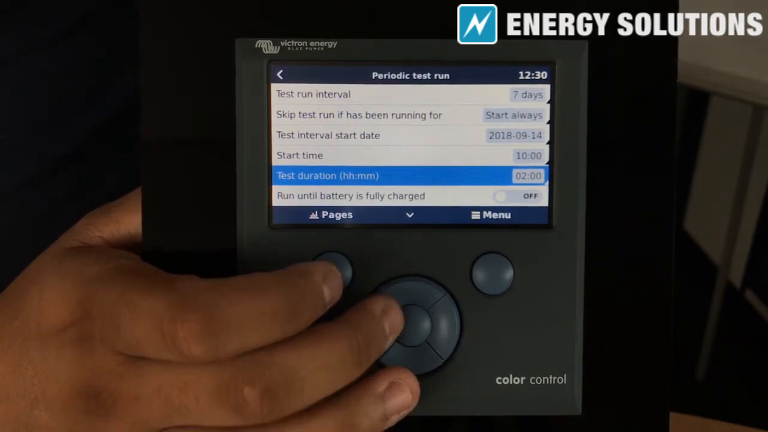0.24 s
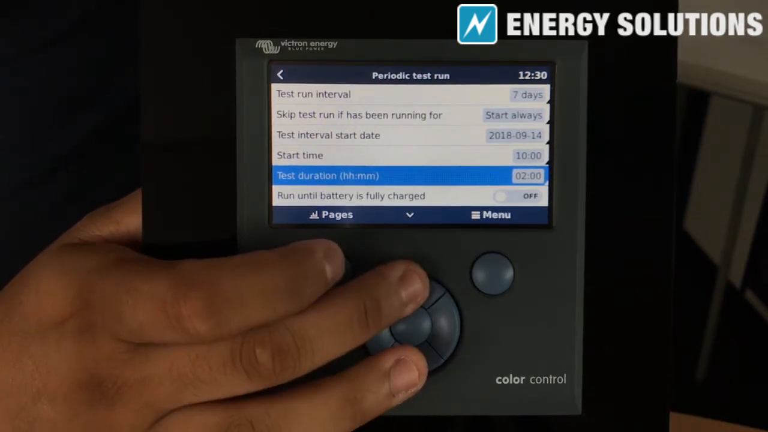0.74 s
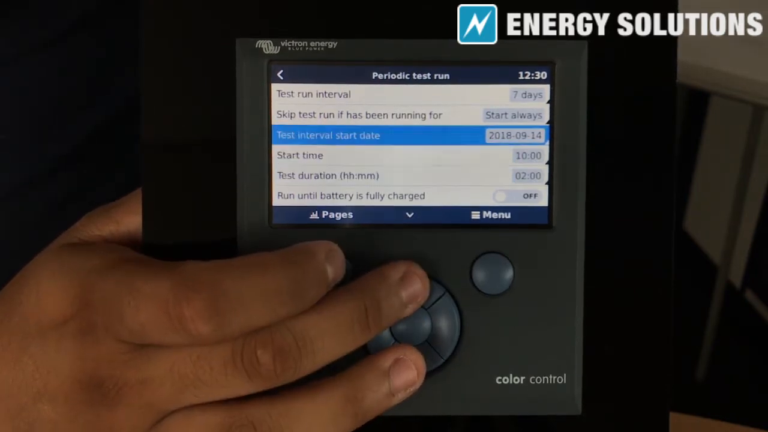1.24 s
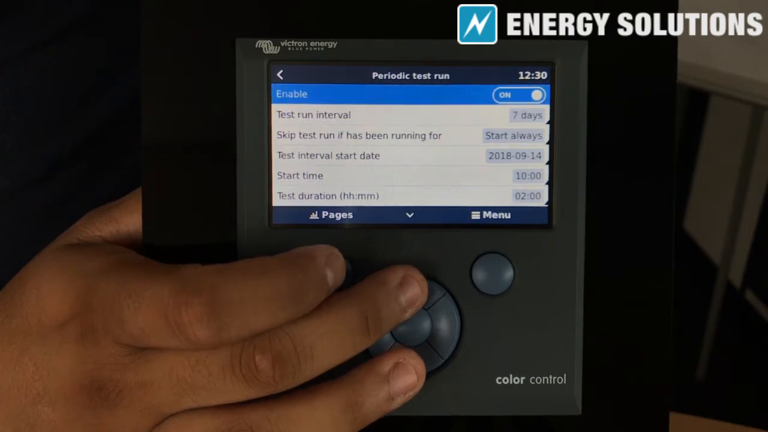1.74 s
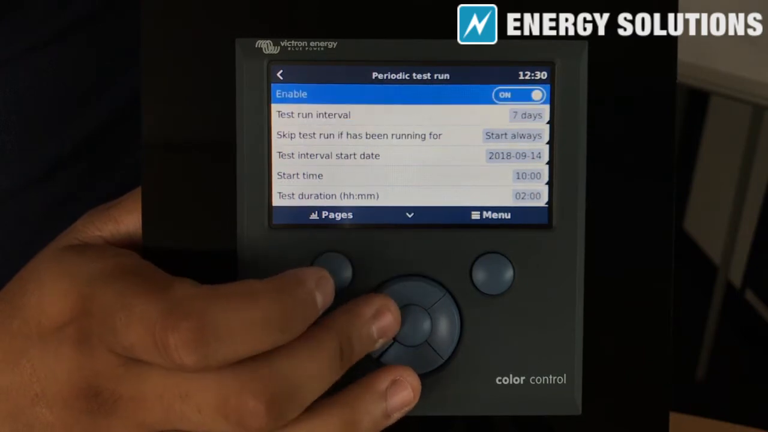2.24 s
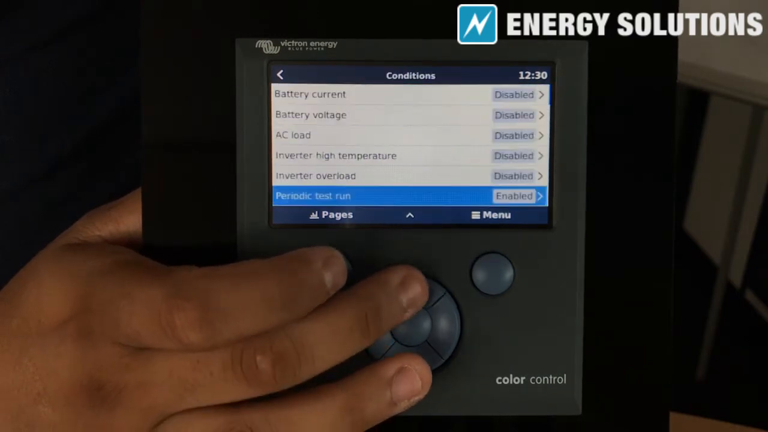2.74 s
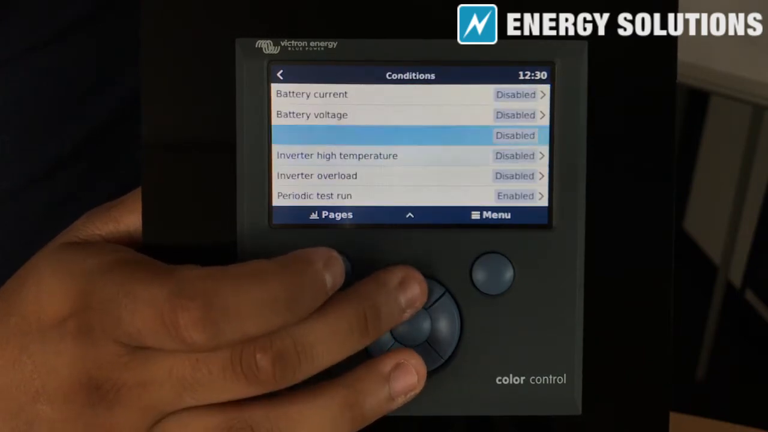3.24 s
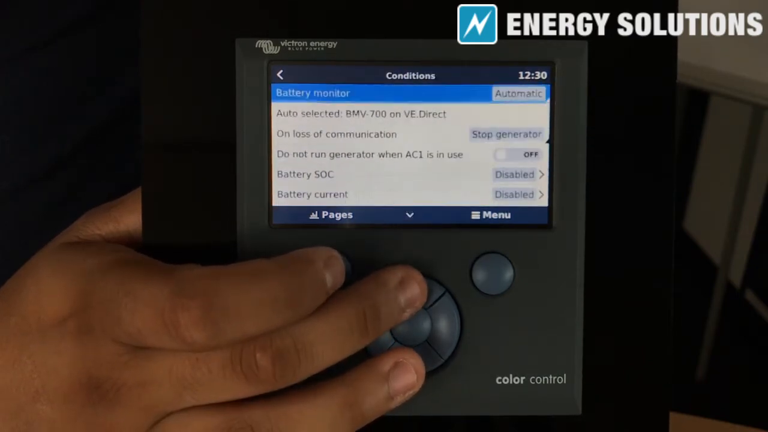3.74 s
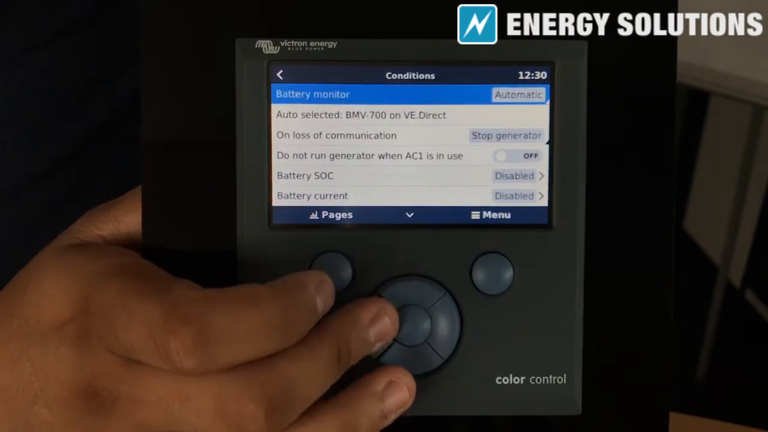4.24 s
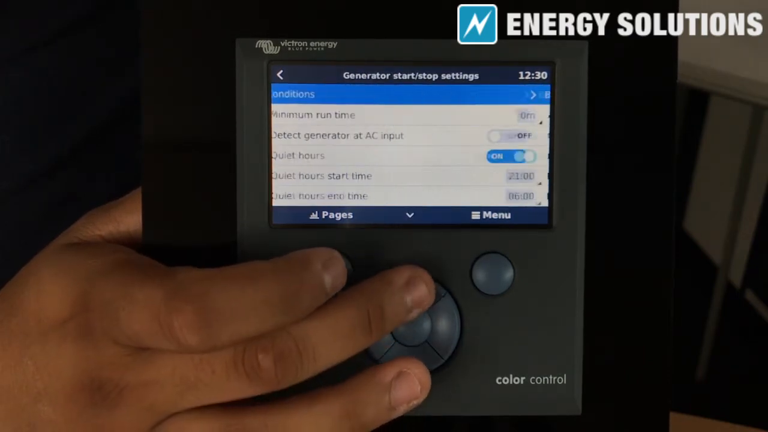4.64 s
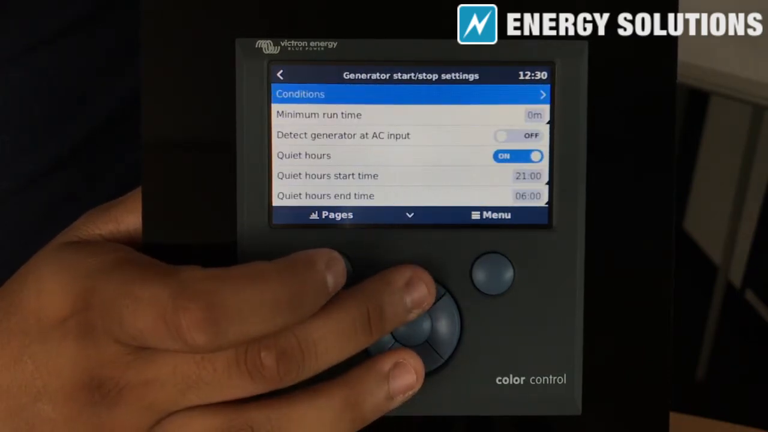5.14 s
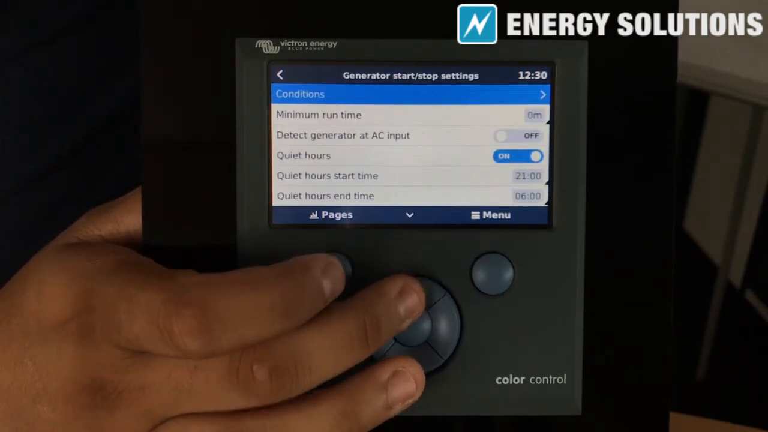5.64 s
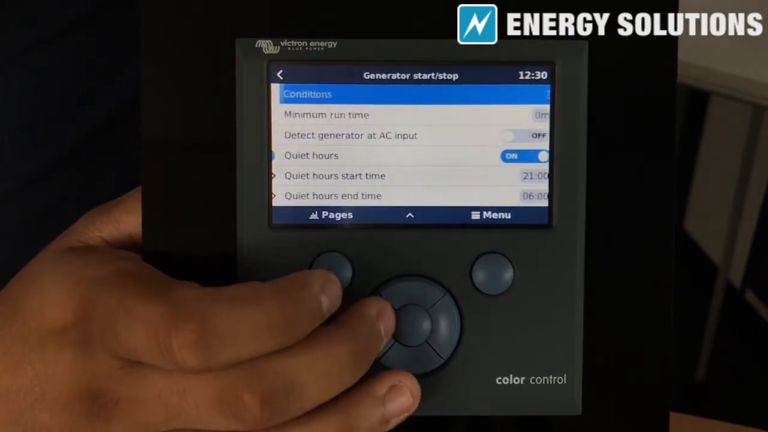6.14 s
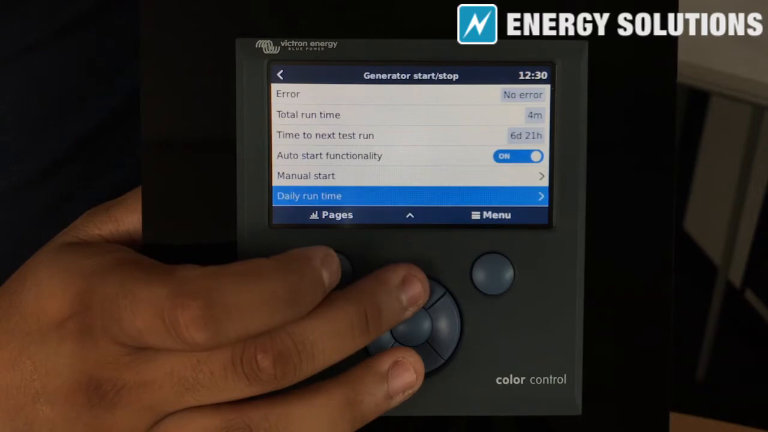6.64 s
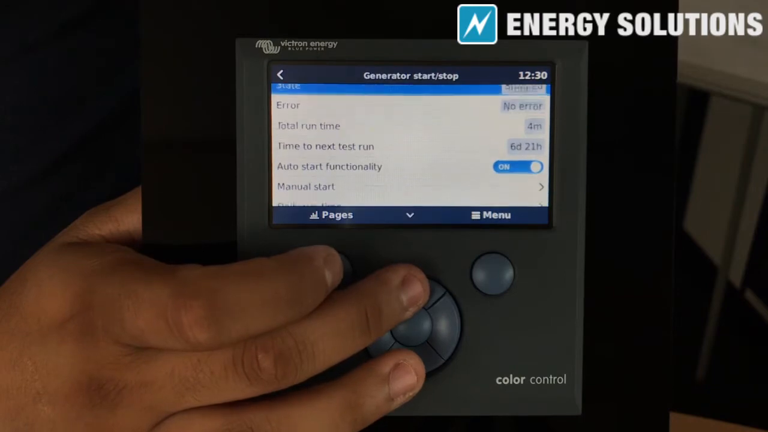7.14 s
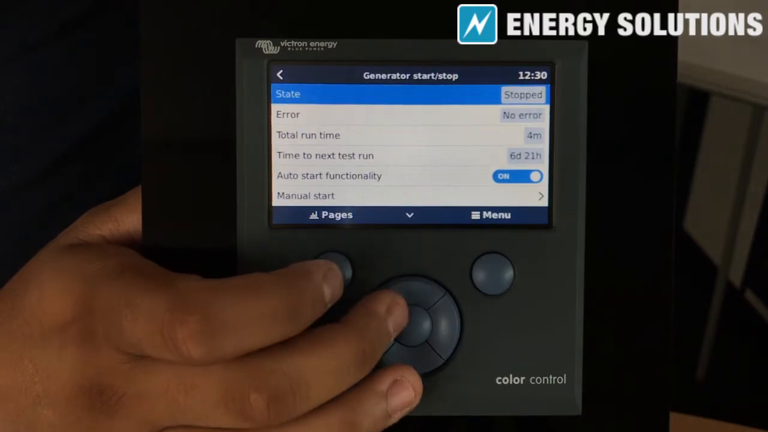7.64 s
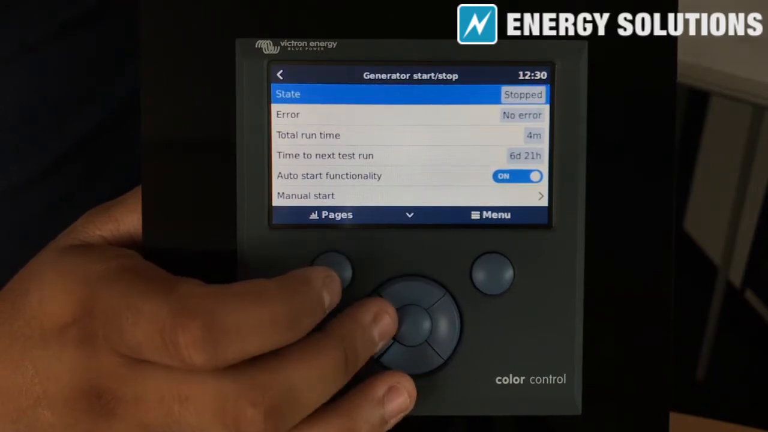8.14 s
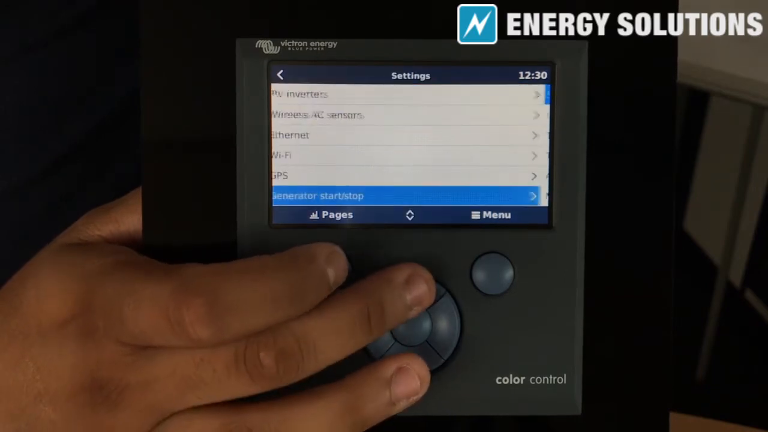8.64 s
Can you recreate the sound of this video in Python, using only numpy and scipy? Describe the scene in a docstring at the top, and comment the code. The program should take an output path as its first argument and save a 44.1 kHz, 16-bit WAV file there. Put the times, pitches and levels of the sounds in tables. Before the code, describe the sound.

Seventeen sharp plastic clicks, single and very short, sound irregularly over nine seconds in a quiet indoor space. Slow press and release pairs from a directional pad alternate with quicker pairs from a button, slightly different in tone. Soft skin taps touch the panel between snaps, and one light brushing passes near the start. Distant low bumps and a dull thud sit under the steady room tone and microphone hiss; the pickup is close.

```python
"""Two dome switches in a quiet room

A finger works two keys, a pad and a button, on a small plastic control panel close to a camera.
Each dome's snap is one sharp push that rings the panel's modes; nearby walls and the room answer.
Fingertips tap the panel as shaken noise, and a hand or sleeve brushes by as swelling coloured noise.
Filtered noise makes the far-off rumble, bumps and thud, the room tone and the microphone's hiss."""
import sys
import numpy as np
from scipy import signal
from scipy.fft import rfft, irfft, next_fast_len
from scipy.io import wavfile
from scipy.ndimage import uniform_filter1d, map_coordinates

SR = 44100
rng = np.random.default_rng(int(sys.argv[2]) if len(sys.argv) > 2 else 0)


def digitize_waveform(pressure):
    """Quantize a signal to 16-bit integers and store it at the path in sys.argv[1].

    Rows of a 2-D input are taken as channels; values are limited to [-1, 1].
    """
    field = np.atleast_2d(pressure).T
    bounded = np.clip(field, -1, 1)
    quanta = np.round(bounded * 32767).astype(np.int16)
    wavfile.write(sys.argv[1], SR, quanta)


N = 392445

# Ringing modes of the plastic panel, with a relative level for each kind of snap:
# mode_hz, width_hz, pad_down_db, pad_up_db, button_down_db, button_up_db
PANEL_MODES = [(316, 46.7, -7.5, -8.5, -6.5, -3.5), (604, 82, -21, -19.5, -17.5, -12),
               (965, 120, -11, -12, -13, -10.5), (1286, 89, -6.5, -5, -16, -13),
               (1650, 530, -13, -12, -9, -6.5), (2327, 240, -11.5, -10, -11.5, -8),
               (2934, 140, -10.5, -7.5, -17.5, -19), (3750, 230, -1.5, 3.5, -6, -3.5),
               (4190, 300, -3, 1.5, -6, -2), (5080, 250, -1, 6, -1, 2.5), (5644, 230, 2.5, 9.5, 5, 12),
               (6356, 150, 2.5, 10.5, 0.5, 7), (6926, 130, 5.5, 11.5, 7, 11),
               (7200, 83, 3.5, -3.5, -1, 3.5), (8260, 160, 2.5, -1.5, 10, 6.5),
               (9640, 150, -7.5, -7, -4.5, -14), (10940, 400, -5, -5.5, -9, -10.5),
               (11600, 400, -8, -17, -2, -3), (12550, 500, -33, 0, 1, -13), (12400, 400, -1.5, -5, -12, 0),
               (14300, 700, -7.5, -16, -8.5, -26), (15050, 460, -6.5, -6.5, -20, -22.5)]


def air():
    """Steady room tone and the microphone's hiss, each a noise of fixed colour."""
    # Colour of the room tone: frequency_hz, relative_density_db
    tone_colour = [(120, -28), (200, -3), (263, -11.5), (308, -8), (484, -15.5), (680, -15.5), (806, -17.5),
                   (1330, -18.5), (2000, -21.5), (3000, -28.5), (3900, -59.5), (6600, -120)]
    # Colour of the microphone hiss: frequency_hz, relative_density_db
    hiss_colour = [(1500, -12.5), (2800, 0), (4000, 1), (4900, -3.5), (6500, -2), (7700, -5.5),
                   (9000, -3.5), (10400, -8), (12000, -4.5), (15700, -6)]
    tone_db, hiss_db, hiss_top_hz = -72, -76.5, 15800
    tone = noise(lambda f: colour_gain(f, tone_colour))
    hiss = noise(lambda f: colour_gain(f, hiss_colour) * (f < hiss_top_hz))
    return amp(tone_db) * tone + amp(hiss_db) * hiss


def building():
    """Low room modes fed by distant noise and bumps, and one dull thud through the structure."""
    # Low modes of the room: mode_hz, width_hz, level_db, share of the swing it follows
    rumble_modes = [(48, 26, -66, .1), (90.4, 30, -65.5, 1), (157, 123, -65.5, 0.9)]
    # How the rumble swells and sinks: time_s, swing_db
    rumble_swing = [(0, -2.5), (1.2, -2.5), (2.5, 1), (3.8, 2.5), (5.1, 3), (5.5, -1), (6.4, -2.5),
                    (7.2, -2.5), (8.9, 0.5)]
    # Far bumps, each swelling the low mode nearest its pitch: peak_s, level_db, mode_hz
    far_bumps = [(1.91, -59.5, 90), (3.03, -55.5, 90), (3.62, -60.5, 90), (4.241, -59.5, 50),
                 (4.34, -56, 90), (7.93, -55.5, 50), (8.029, -50, 90), (8.43, -58.5, 90)]
    # The far-off thud: start_s, level_db
    far_thud = (6.646, -51)
    # Modes that colour the thud: mode_hz, width_hz, relative_level_db
    thud_modes = [(186, 29, 3), (372, 39, -2), (542, 42, -10), (790, 280, -19.5), (1300, 290, -24.5)]
    waver_db, waver_rate = 1.5, 4  # depth, random knots a second
    bump_rise, bump_fall = 120, 120  # dB a second
    thud_rise, thud_fall, thud_hold_s = 2400, 174, 0.074  # dB a second, dB a second, s

    swing_db = np.interp(np.arange(N) / SR, *np.transpose(rumble_swing))
    rumble = np.zeros(N)
    for hz, width_hz, level_db, share in rumble_modes:
        steady = amp(level_db + share * swing_db + waver_db * wobble(waver_rate))
        bumps = np.zeros(N)
        for peak_s, peak_db, bump_hz in far_bumps:
            if abs(np.log(bump_hz / hz)) < 0.25:
                bumps += swell(peak_s, peak_db, bump_rise, bump_fall)
        # unrelated noises add as powers
        rumble += np.hypot(steady, bumps) * noise(lambda f: resonance(f, hz, width_hz) ** 2)

    def thud_response(f):
        return sum((-1) ** k * amp(db) * resonance(f, hz, width_hz)
                   for k, (hz, width_hz, db) in enumerate(thud_modes))

    thud_gain = swell(*far_thud, thud_rise, thud_fall, thud_hold_s)
    return rumble + thud_gain * noise(thud_response)


def taps():
    """Soft skin contact: stick and slip shakes the panel modes near one pitch, under a brief tick."""
    # Fingertips touching or leaving the keys; level is the loudest 3 ms, t60 is the body's decay:
    # start_s, level_db, centre_hz, low_db, treble_db, t60_s
    finger_taps = [(0.3956, -56.5, 5500, 0, -22, 0.018), (0.4021, -47.5, 2500, -14, -24, 0.02),
                   (0.4469, -48.5, 3680, 1.5, -16, 0.02), (1.291, -68, 1680, -3, -7, 0.065),
                   (1.334, -65, 1650, -10, -12, 0.035), (1.487, -73, 1630, -1, -10, .03),
                   (1.9914, -66.5, 1550, -13, -17, 0.015), (2.657, -50.5, 2400, -9, -21, 0.034),
                   (2.7296, -62.5, 2100, 1, -10, 0.027), (4.0903, -57.5, 1400, -8, -16, 0.051),
                   (4.562, -48, 2290, -9.5, -16, 0.026), (6.443, -71.5, 3750, -9.5, -20, 0.027),
                   (6.5296, -71, 3750, -12, -13, 0.033), (7.702, -58, 2380, -19.5, 2, 0.018),
                   (8.5912, -55, 2400, 2, -4, 0.02), (8.5985, -45.5, 2400, 1, -3.5, 0.039),
                   (8.667, -66.5, 1830, -6, -11.5, .03)]
    treble_life = 0.48  # share of the body's decay time
    band_width = 0.34  # width of the shaken band over its centre
    out, t = np.zeros(N), np.arange(2048) / SR

    def modes(f):
        return sum((-1) ** k * resonance(f, m[0], 1.2 * m[1]) for k, m in enumerate(PANEL_MODES))

    for start_s, level_db, hz, low_db, treble_db, t60 in finger_taps:
        unevenness = unit(uniform_filter1d(rng.standard_normal(len(t)), size=12))
        grit = rng.standard_normal(len(t)) * amp(2 * unevenness)
        grit *= 1 - np.exp(-t / 0.0005)  # soft onset

        def dying(life_s):
            return grit * amp(-60 * t / np.clip(life_s, 0.004, 0.1))

        def body_response(f):
            near_pitch = abs(resonance(f, hz, band_width * hz) ** 2)
            low = amp(low_db) * abs(resonance(f, 1230, 700) ** 2)
            return modes(f) * (near_pitch + low)

        def treble_response(f):
            return modes(f) * amp(treble_db) * abs(resonance(f, 4800, 6600) ** 2)

        body = filtered(dying(t60), body_response)
        tick = filtered(dying(treble_life * t60), treble_response)
        tap = body + tick
        tap *= amp(level_db) / np.sqrt(np.max(uniform_filter1d(tap ** 2, size=128)))
        add(out, start_s, tap)
        add(out, start_s, signal.fftconvolve(tap, room(wet_db=-13.0)))
    return out


def switches():
    """Each dome snap is one sharp push into all panel modes, heard straight and through the room."""
    # Dome snaps: start_s, kind of snap, strength_db
    dome_snaps = [(1.0554, "pad down", -1.5), (1.8102, "pad up", 0.5), (2.303, "button down", -1.5),
                  (2.5003, "button up", -0.5), (3.0022, "pad down", -1), (4.0358, "pad up", 0.5),
                  (4.2595, "button down", -1), (4.4232, "button up", -1), (4.9736, "pad down", -1),
                  (5.5807, "pad up", 0.5), (5.9899, "button down", 0), (6.1885, "button up", -0.5),
                  (6.624, "pad down", -1), (7.5521, "pad up", 0.5), (8.2647, "button down", -1),
                  (8.4389, "button up", -0.5), (8.8403, "pad down", -1)]
    # Kinds of snap, in the order of the panel's level columns
    snap_kinds = ["pad down", "pad up", "button down", "button up"]
    # whether each mode moves outward or inward at the place of the key
    pad_side, button_side = "+--++++-++-+-----++-++", "++++-++------++++--+++"
    scatter_db = 0.22  # random spread of each mode, snap to snap
    blur = 4  # modes look this much wider from all around
    out = np.zeros(N)
    push = np.eye(1, 4096)[0]  # a single-sample impulse
    levels_db = dict(zip(snap_kinds, np.transpose(PANEL_MODES)[2:]))

    for start_s, kind, strength_db in dome_snaps:
        side = pad_side if "pad" in kind else button_side
        signs = np.array([1 if c == "+" else -1 for c in side])
        scatter = scatter_db * rng.standard_normal(len(PANEL_MODES))
        gains = signs * amp(strength_db + levels_db[kind] + scatter)

        def straight(f):
            return sum(g * panel_mode(f, m[0], m[1]) for g, m in zip(gains, PANEL_MODES))

        def all_around(f):
            # over all directions the modes add as powers, and the gaps between them fill
            powers = (abs(g * panel_mode(f, m[0], blur * m[1])) ** 2 for g, m in zip(gains, PANEL_MODES))
            return np.sqrt(sum(powers))

        add(out, start_s, filtered(push, straight))
        add(out, start_s, filtered(room(wet_db=-19.0), all_around))
    return out


def brush():
    """A hand or sleeve slides briefly, twice: coloured noise that swells and sinks."""
    # Soft rustles: peak_s, level_db
    strokes = [(1.352, -61.5), (1.5, -71)]
    # Colour of the rustle: frequency_hz, relative_density_db
    rustle_colour = [(410, 0.5), (700, -3.5), (905, -8), (1360, -1.5), (2630, -15), (4130, -17.5),
                     (9000, -20), (11700, -33), (19800, -120)]
    rise, fall = 200, 150  # dB a second
    gain = sum(swell(peak_s, db, rise, fall) for peak_s, db in strokes)
    return gain * noise(lambda f: colour_gain(f, rustle_colour))


def room(wet_db):
    """The room's answer to one push: rough walls, and a diffuse tail dying at its own speed per band."""
    # Decay and colour of the room by band: frequency_hz, t60_s, colour_db
    room_bands = [(300, 0.34, 4), (1200, 0.26, 9), (2500, 0.27, 2), (4000, 0.23, -0.5), (5500, .33, -4),
                  (6895, 0.29, 0), (7700, 0.3, 0), (8600, 0.22, -5), (10400, 0.23, -6), (12200, 0.21, -3),
                  (15000, 0.16, -4.5)]
    # Reflections from nearby walls, before the room's colour: delay_s, level_db
    near_walls = [(.0057, -33.5), (0.0093, -38), (0.0123, -30), (0.0426, -45.5)]
    points_hz, t60, colour_db = np.transpose(room_bands)
    hz, frame_s, bins = signal.stft(rng.standard_normal(SR // 3), SR, nperseg=256)
    decay = amp(-60 * frame_s / along(hz, points_hz, t60)[:, None])
    tail = signal.istft(bins * decay, SR, nperseg=256)[1]
    t = np.arange(len(tail)) / SR
    tail = tail * (1 - np.exp(-(t / 0.001) ** 2))  # the tail builds up
    tail = tail * (1 + amp(7 - 60 * t / 0.035))  # things close by crowd the start
    tail = amp(wet_db) * tail / np.linalg.norm(tail)

    smear = amp(-60 * np.arange(512) / SR / 0.012)
    for delay_s, wall_db in near_walls:
        # small hard faces return mid treble
        faces = filtered(rng.standard_normal(len(smear)), lambda f: resonance(f, 6300, 4000) ** 2)
        scattered = smear * faces
        add(tail, delay_s, amp(wall_db) * scattered / np.linalg.norm(scattered))
    return filtered(tail, lambda f: amp(along(f, points_hz, colour_db)))


def panel_mode(f, hz, width_hz):
    """A bending mode sends out little sound far below its own pitch."""
    radiation = 1j * f / (1j * f + 0.56 * hz) * 1.058
    return resonance(f, hz, width_hz) * radiation


def resonance(f, hz, width_hz):
    """The response of a damped mode, gain 1 at its centre."""
    return 1j * f * width_hz / (hz * hz - f * f + 1j * f * width_hz)


def amp(db):
    """The amplitude for a level in dB."""
    return 10 ** (np.asarray(db) / 20)


def unit(x):
    """x scaled to rms 1."""
    return x / np.sqrt(np.mean(x ** 2) + 1e-20)


def along(hz, points_hz, values):
    """Values joined on a log-frequency axis."""
    return np.interp(np.log(hz + 1), np.log(np.asarray(points_hz) + 1), values)


def colour_gain(f, colour):
    """The gain at f from rows of frequency in Hz and level in dB."""
    return amp(along(f, *np.transpose(colour)))


def filtered(x, response):
    """x times a response of frequency, real or complex."""
    m = next_fast_len(len(x) + 8192)
    return irfft(rfft(x, m) * response(np.fft.rfftfreq(m, 1 / SR)), m)[:len(x)]


def noise(response):
    """Noise of rms 1 in the given colour."""
    return unit(filtered(rng.standard_normal(N), response))


def add(track, s, sound):
    """Mixes a sound in at time s, cut where the track ends."""
    part = track[round(s * SR):][:len(sound)]
    part += sound[:len(part)]


def swell(s, db, rise, fall, hold_s=0):
    """A gain that climbs to db at time s, holds, and sinks again, at steady dB a second."""
    t = np.arange(N) / SR - s
    return amp(db + rise * np.minimum(t, 0) - fall * np.maximum(t - hold_s, 0))


def wobble(rate):
    """A smooth random curve, rate knots a second."""
    return map_coordinates(rng.standard_normal(256), [np.arange(N) * rate / SR])


def scene():
    """All sources through the microphone's treble roll-off, over the room tone and hiss."""
    # Roll-off of the microphone: frequency_hz, gain_db
    mic_response = [(14500, 0), (15600, -6.5), (16200, -19.5), (16800, -23)]
    sources = building() + taps() + switches() + brush()
    return (filtered(sources, lambda f: colour_gain(f, mic_response)) + air())[None]


def record(dry):
    """The camera keeps nothing above its band limit."""
    top_hz = 16800
    return filtered(dry[0], lambda f: f < top_hz)[None]


dry = scene()
out = record(dry)
digitize_waveform(out)
```